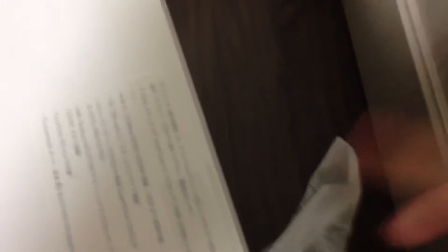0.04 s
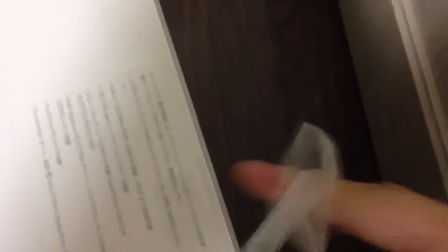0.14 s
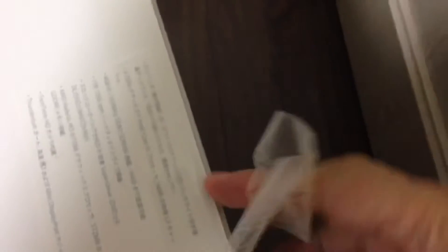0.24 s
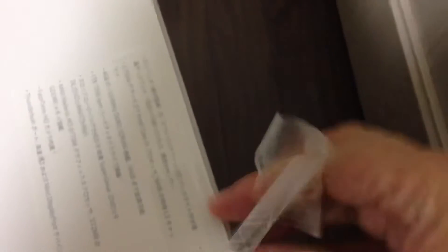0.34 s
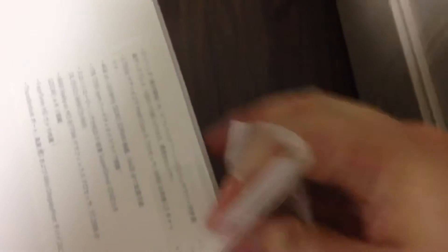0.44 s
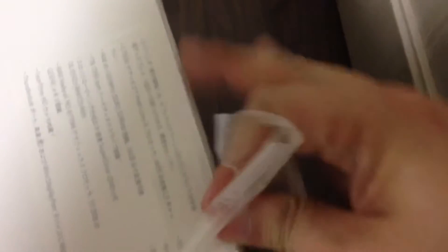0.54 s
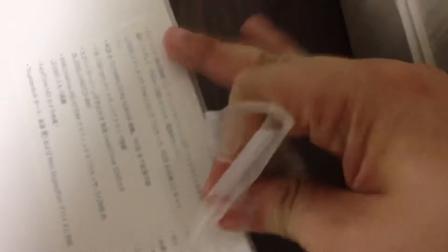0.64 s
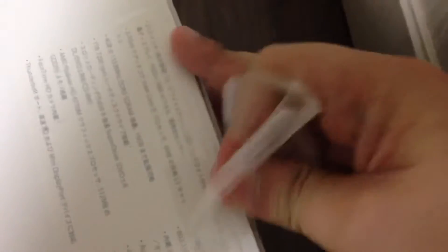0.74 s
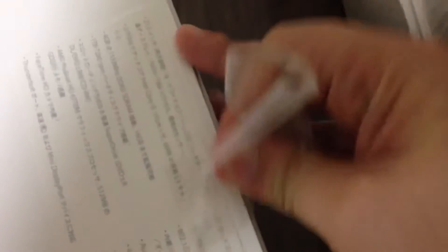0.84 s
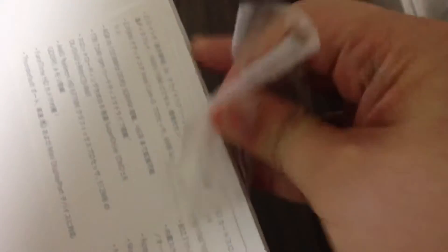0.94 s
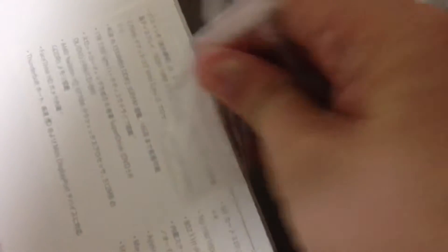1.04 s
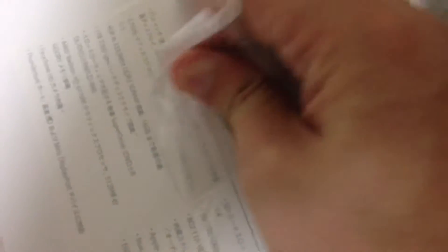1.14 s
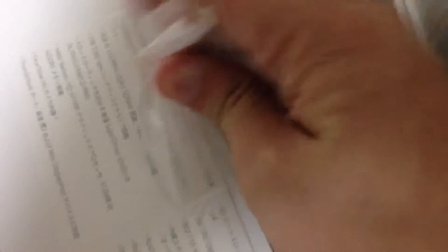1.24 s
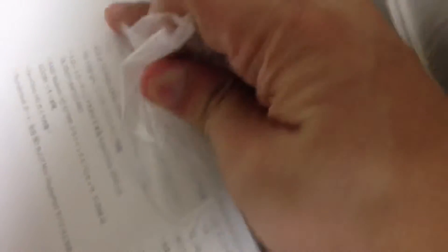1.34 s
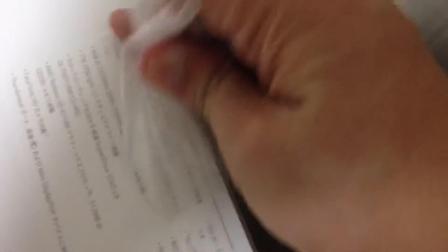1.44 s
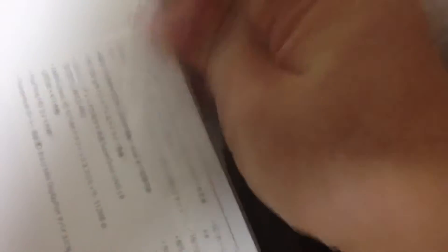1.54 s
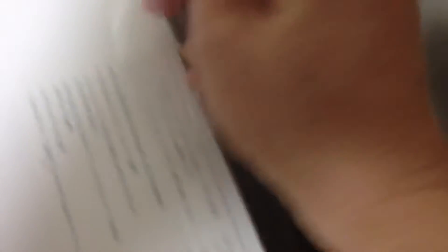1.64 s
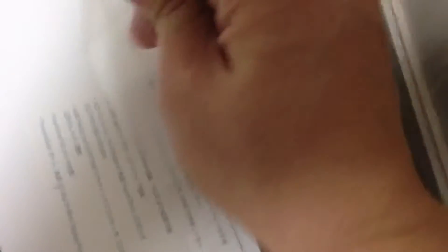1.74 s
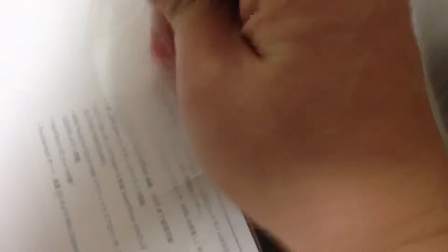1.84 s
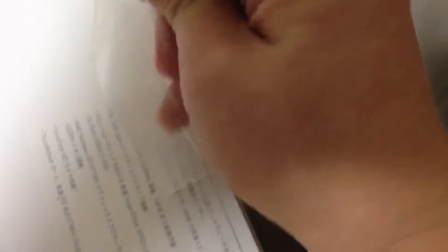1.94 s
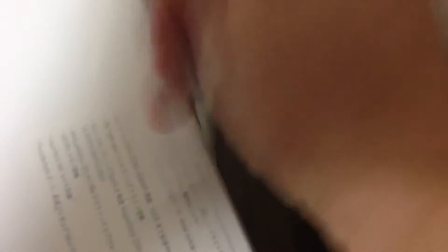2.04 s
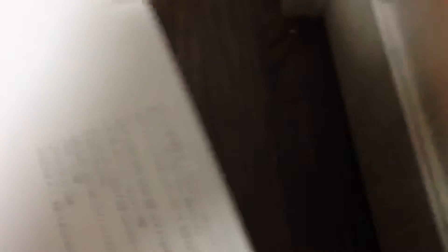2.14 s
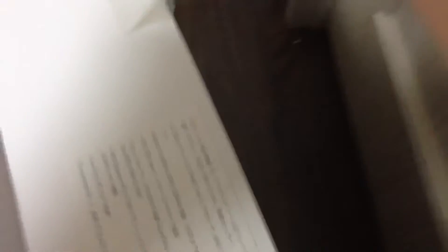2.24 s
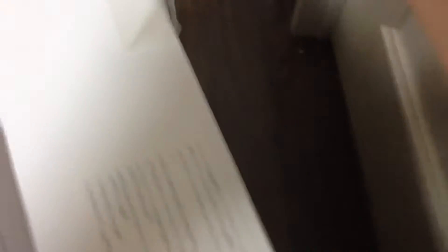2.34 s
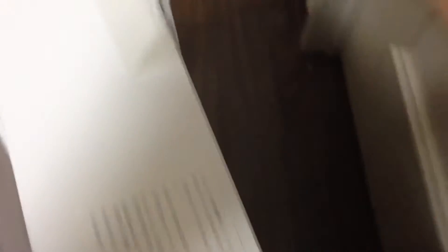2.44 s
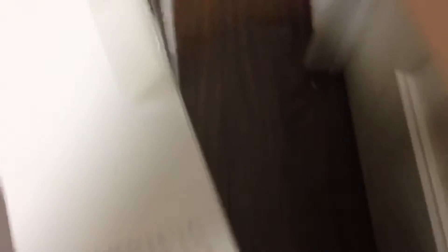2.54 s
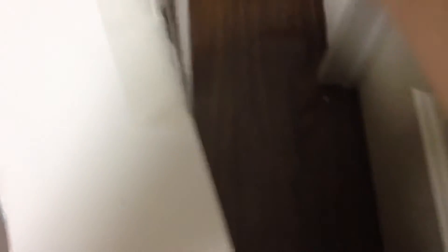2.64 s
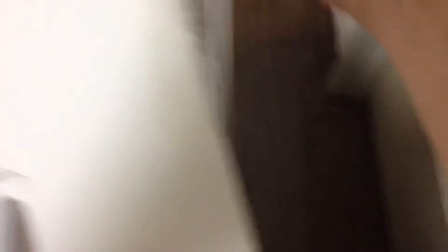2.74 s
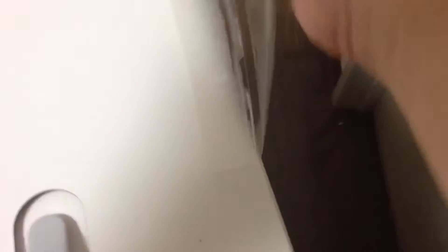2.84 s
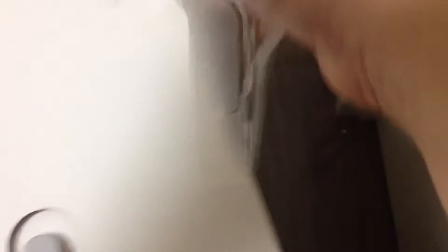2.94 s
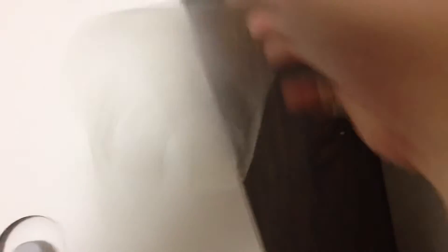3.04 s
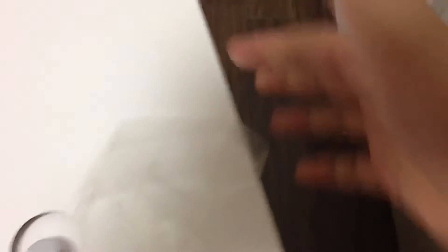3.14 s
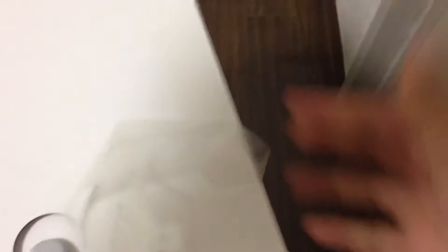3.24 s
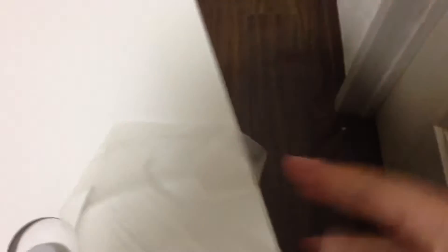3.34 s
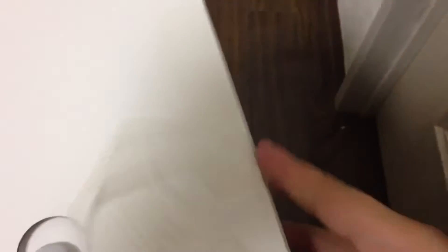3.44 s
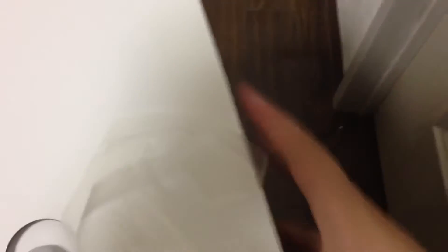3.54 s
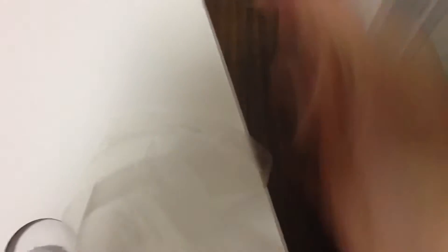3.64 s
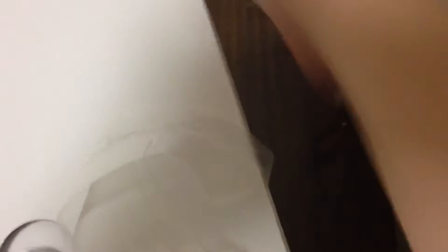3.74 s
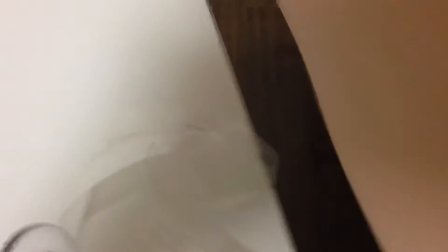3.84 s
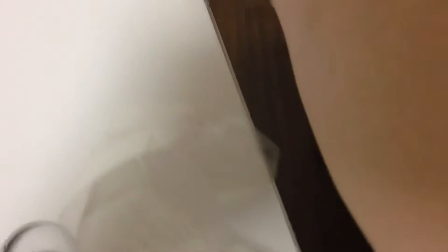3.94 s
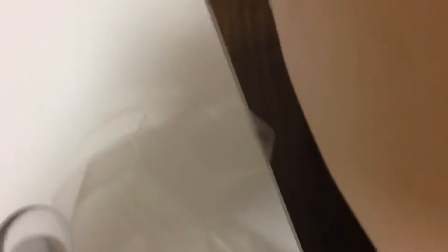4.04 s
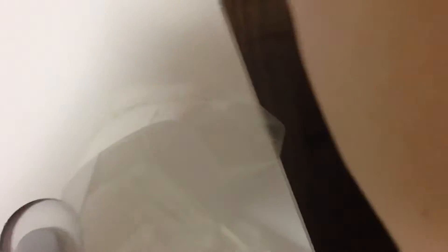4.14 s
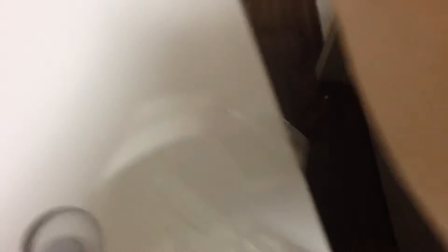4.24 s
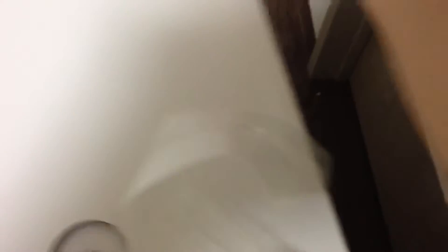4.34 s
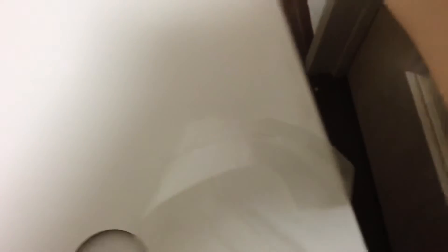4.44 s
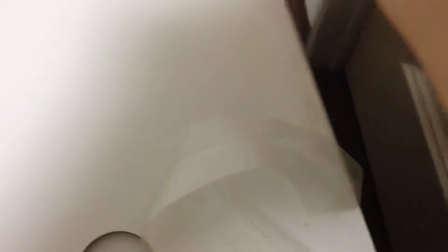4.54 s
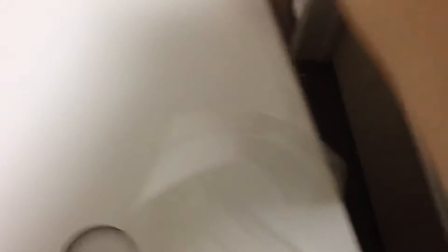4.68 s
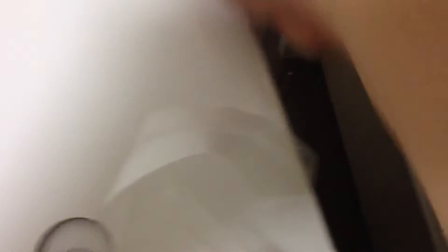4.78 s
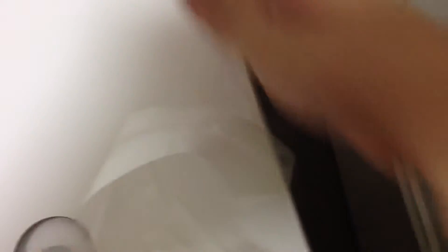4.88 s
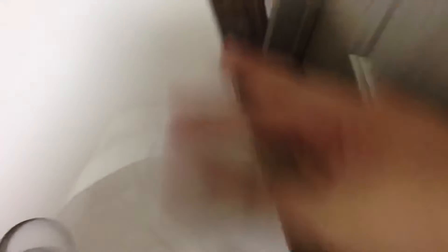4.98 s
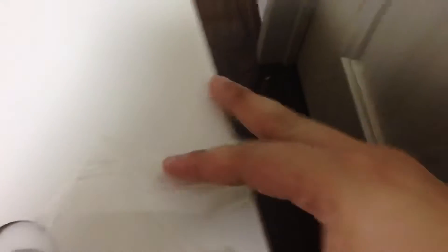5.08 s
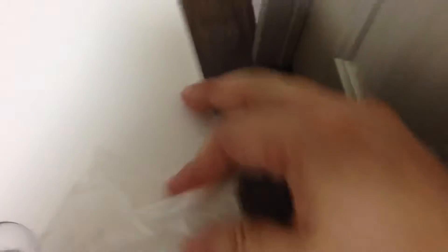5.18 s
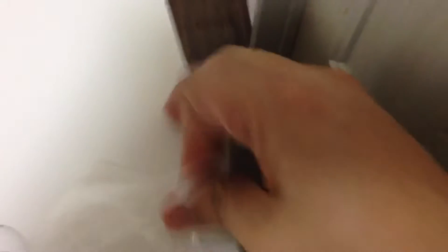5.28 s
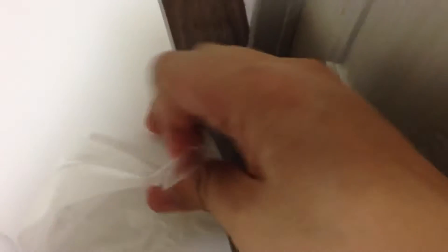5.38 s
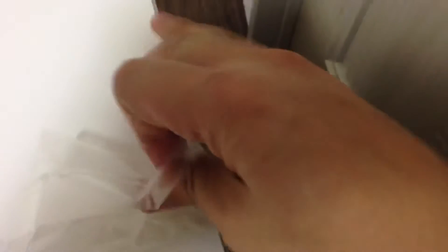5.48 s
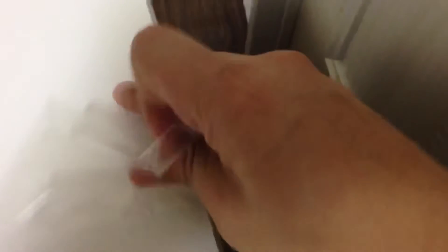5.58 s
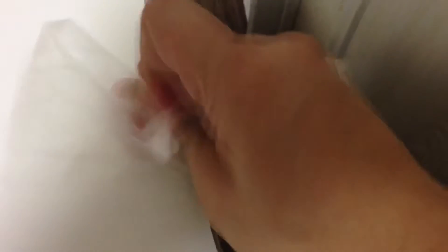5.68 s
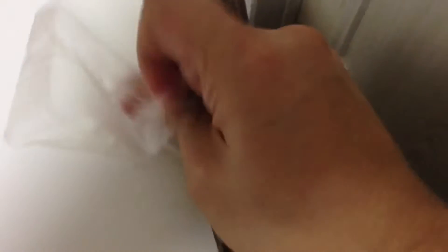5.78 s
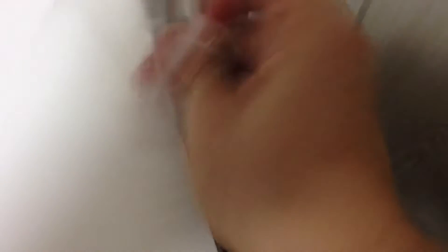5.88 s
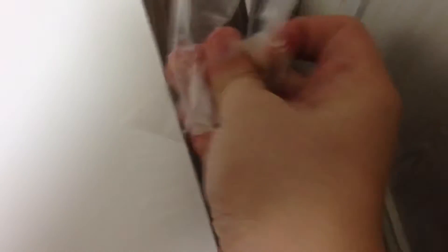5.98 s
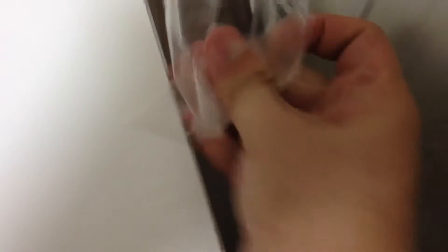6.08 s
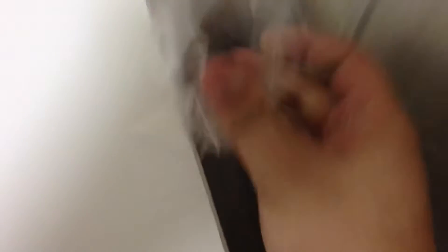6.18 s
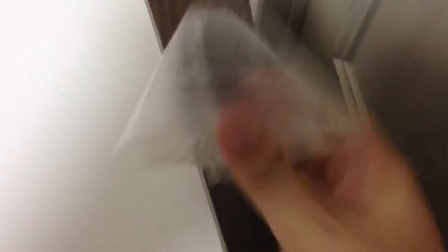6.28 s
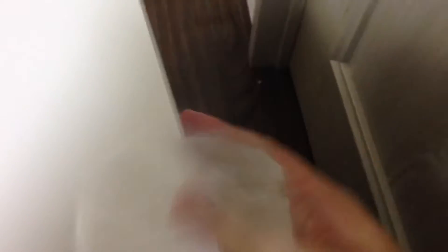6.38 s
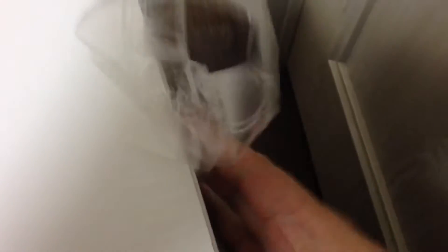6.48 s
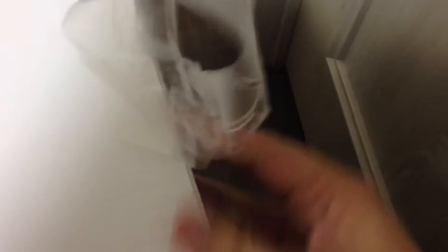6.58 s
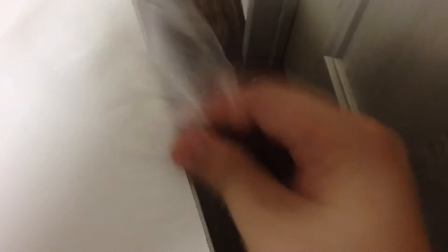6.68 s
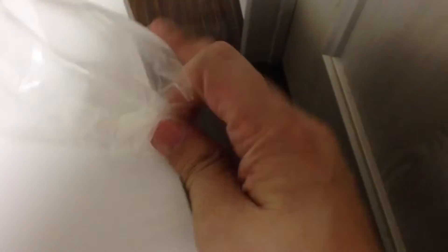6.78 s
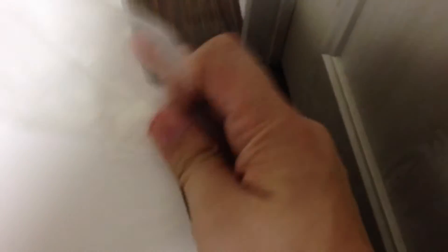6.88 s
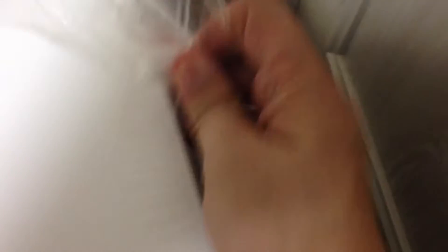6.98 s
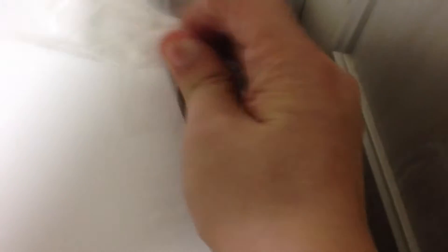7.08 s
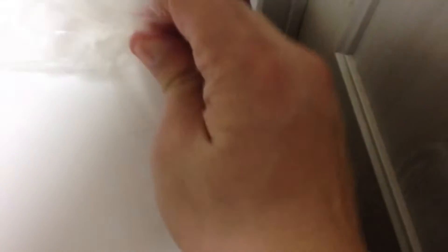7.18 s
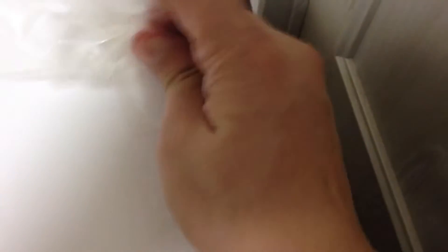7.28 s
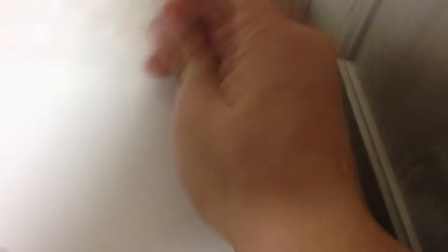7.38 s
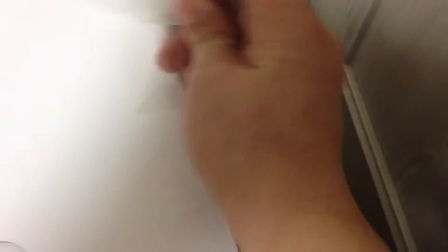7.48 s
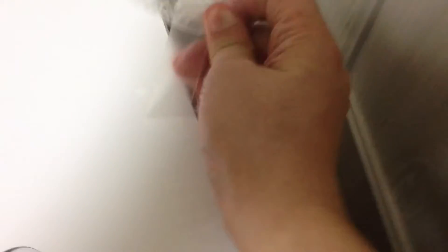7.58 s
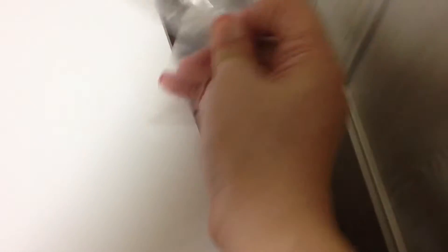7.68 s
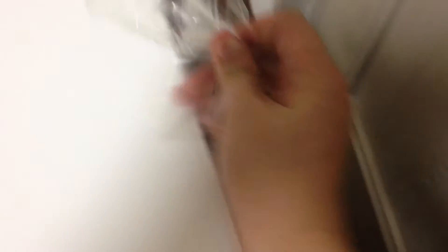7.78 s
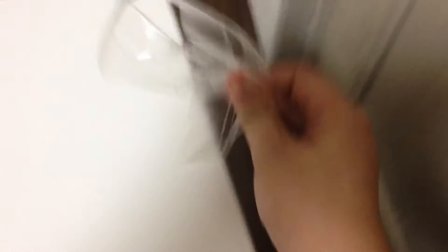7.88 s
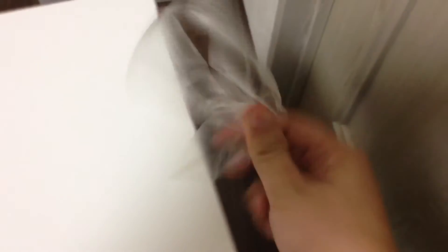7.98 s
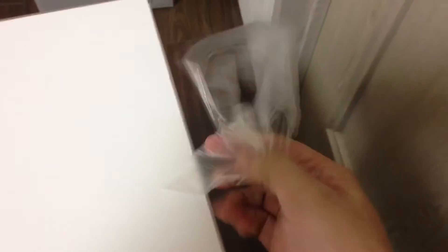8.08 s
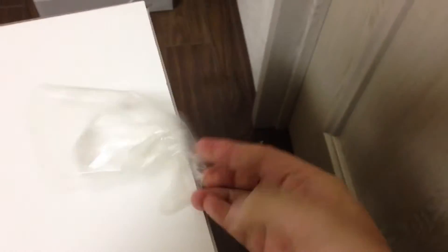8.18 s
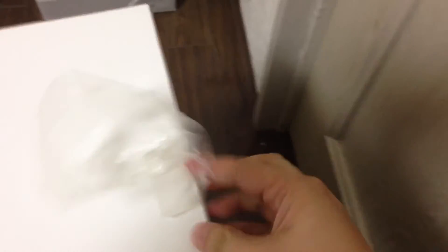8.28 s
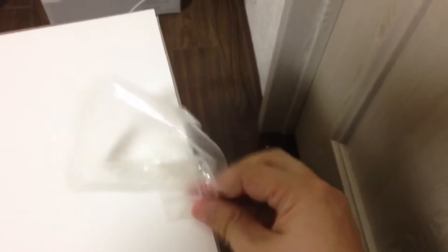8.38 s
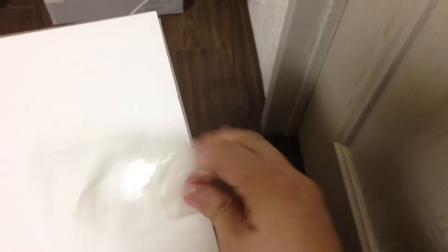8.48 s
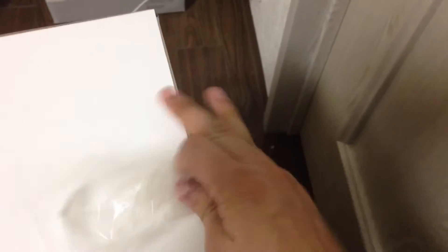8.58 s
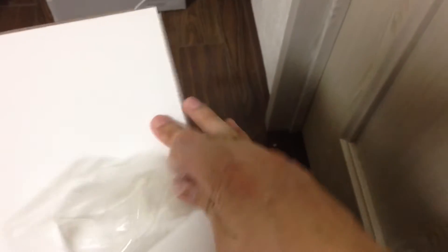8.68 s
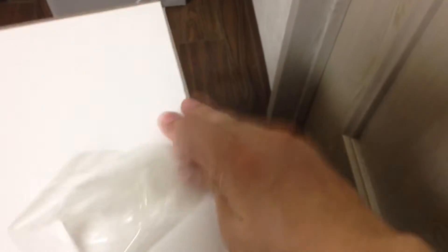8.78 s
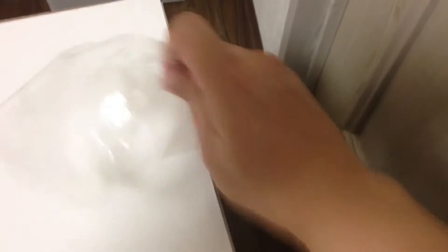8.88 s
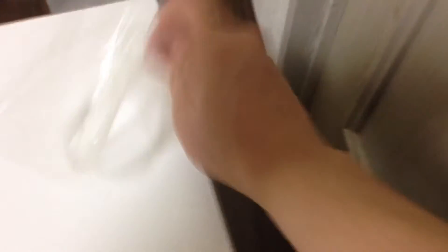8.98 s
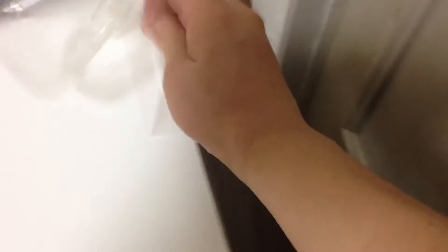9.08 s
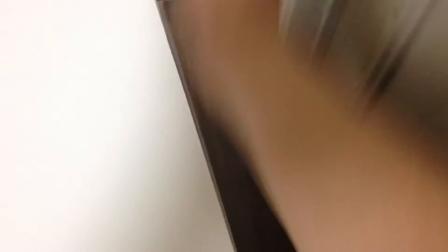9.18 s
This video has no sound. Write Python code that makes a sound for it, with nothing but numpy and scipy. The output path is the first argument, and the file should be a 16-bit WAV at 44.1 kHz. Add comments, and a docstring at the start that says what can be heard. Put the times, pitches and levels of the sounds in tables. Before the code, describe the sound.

A hand handles a crinkly plastic bag lying on a cardboard box, heard close up. Sharp, dry crackles jump out singly or in fast clumps, some with a short woody box thud. Between them fingers brush the film with light hiss and tiny ticks. The middle is quieter and duller; the second half is busy and loud. Indoors, with very short echoes, little bass and a faint steady hiss.

```python
"""In a small, dead room, a hand tugs at a stiff plastic bag lying on a cardboard box.
Creases in the film snap singly or in short ripping runs: clicks coloured by the film.
The hollow box thuds along: the same clicks set off its decaying tones.
Fingers rustle and brush over the film (tiny clicks and hiss), and their rubbing makes the box murmur.
The room adds short echoes and a faint hiss."""
import sys
import numpy as np
from scipy import signal
from scipy.fft import rfft, irfft
from scipy.io import wavfile
from scipy.ndimage import uniform_filter1d

SR = 44100
rng = np.random.default_rng(int(sys.argv[2]) if len(sys.argv) > 2 else 0)


def materialize(psi):
    """Save the field psi as 16-bit PCM at rate SR to the path in sys.argv[1].

    A 1-D psi becomes a single channel; in a 2-D psi each row is a channel.
    """
    bounded = np.clip(np.atleast_2d(psi).T, -1, 1)
    quanta = np.round(bounded * 32767).astype(np.int16)
    wavfile.write(sys.argv[1], SR, quanta)


N = 406602
PLACES = 6   # spots on the bag, each with its own echoes

# how the plastic film colours a click: pitch_hz [Hz], level_db [relative dB per Hz]
FILM_COLOUR = [(290, -58), (500, -13.5), (647, -17), (746, -8.5), (1010, -6.5), (2370, -2), (3540, -3.5),
               (5210, -5.5), (9490, -5.5), (15200, -1)]
# ringing tones of the hollow box: pitch_hz [Hz], level_db [relative dB], t60_s [s to fall by 60 dB]
BOX_TONES = [(175, -14, 0.19), (210.2, 4, 0.17), (270.3, 7.5, 0.052), (376, 4, 0.031), (533, 5, 0.025),
             (752, 23, 0.0065), (1200, -4.5, 0.038)]


def from_db(db):
    """Turn decibels into a plain factor."""
    return 10 ** (np.asarray(db) / 20)


def unit(x, axis=None):
    """Scale a sound so that its energy (sum of squares) is 1."""
    return x / np.sqrt(np.sum(x ** 2, axis=axis, keepdims=True) + 1e-20)


def rms_one(x):
    """Scale a sound so that its average (rms) level is 1."""
    return unit(x) * np.sqrt(x.size)


def low_pass(x, hz, order=1):
    """Dull a sound by weakening what lies above hz."""
    return signal.lfilter(*signal.butter(order, hz, fs=SR), x)


def high_pass(x, hz):
    """Thin a sound by gently weakening what lies below hz."""
    return signal.lfilter(*signal.butter(1, hz, "high", fs=SR), x)


def ring(x, hz, sharpness):
    """Keep what lies near hz; a sharper resonance rings for more cycles."""
    return signal.lfilter(*signal.iirpeak(hz, sharpness, SR), x)


def colour(x, spectrum, size=512):
    """Give a sound a spectrum with a filter that answers as early as possible (minimum phase)."""
    hz, level_db = np.transpose(spectrum)
    grid_hz = np.linspace(1, SR / 2, size + 1)
    grid_db = np.interp(np.log(grid_hz), np.log(hz), level_db)
    cepstrum = irfft(np.log(from_db(grid_db)))
    # folding the second half onto the first leaves no sound ahead of a click
    cepstrum[1:size] *= 2
    cepstrum[size + 1:] = 0
    kernel = irfft(np.exp(rfft(cepstrum)))[:size]
    kernel = kernel.reshape((1,) * (x.ndim - 1) + (-1,))
    return signal.fftconvolve(x, kernel, axes=-1)[..., :x.shape[-1]]


def drift(rate_hz):
    """Random curve that wanders slowly around 0 with spread 1: noise smoothed twice."""
    r = np.exp(-2 * np.pi * rate_hz / SR)
    noise = rng.standard_normal(N + SR)
    curve = signal.lfilter([1], [1, -2 * r, r * r], noise)
    return rms_one(curve[SR:])   # the first second only lets the curve settle


def grains(shape, per_s, spread_db):
    """Clicks at random moments, up or down at random, most of them small and a few large."""
    draw = rng.random((3,) + shape)
    sizes = from_db(-spread_db * np.log(np.maximum(draw[0], .01)))
    signs = np.sign(draw[1] - .5)
    happens = draw[2] < per_s / SR
    return sizes * signs * happens


def room_hiss():
    """Steady faint hiss: noise with the spectrum of the quiet room."""
    # pitch_hz [Hz], level_db [relative dB per Hz]
    hiss_colour = [(35, -49), (60, 4.5), (102, -26.5), (225, -4.5), (318, -14), (1650, -28), (1810, -33),
                   (2120, -20), (15200, -28)]
    hiss = colour(rng.standard_normal(N), hiss_colour, size=2048)
    return from_db(-64.5) * rms_one(hiss)


def box_modes(size):
    """Each way the hollow box can vibrate is one sine tone that dies away."""
    t = np.arange(size) / SR
    return np.array([from_db(level_db - 60 * t / t60_s) * np.sin(2 * np.pi * pitch_hz * t)
                     for pitch_hz, level_db, t60_s in BOX_TONES])


def box_rumble():
    """Uneven rubbing sets all tones of the box murmuring."""
    rub = from_db(3.5 * drift(15)) * rng.standard_normal(N)
    rub = signal.lfilter([1], [1, -.95], rub)   # soft skin drives mostly the low tones
    box = box_modes(size=6000).sum(axis=0)
    return rms_one(signal.fftconvolve(rub, box)[:N])


def film_clicks(rustle_db):
    """Clumps of tiny film clicks over a duller sliding hiss; a light touch is nearly all hiss."""
    clicks = grains((N,), per_s=900 * from_db(5.0 * drift(29)), spread_db=6.5)
    dealt = rng.integers(0, PLACES, N)   # each click has the pitch of its own crease
    ringing = np.zeros(N)
    for k, hz in enumerate(np.geomspace(1600, 8000, PLACES)):
        ringing += ring(clicks * (dealt == k), hz, 1.3) / np.sqrt(hz)
    hiss = low_pass(from_db(2.5 * drift(30)) * rng.standard_normal(N), 4500)
    # all hiss at -67 dB and below, all clicks from -34 dB up
    share = np.clip((rustle_db + 67) / 33, 0, 1)
    return colour(share * rms_one(ringing) + (1 - share) * rms_one(hiss), FILM_COLOUR)


def crumpling():
    """Levels of rustle, its treble and rumble: each spell swells, holds and fades over the resting hand."""
    # spells of crumpling in the fingers: start_s [s], length_s [s], rustle_db [dB],
    # treble_db [dB, change of the rustle's treble], rumble_db [dB, murmur of the box]
    crumples = [(0.668, 0.11, -63, 2, -67), (0.882, 0.07, -51, 4, -75), (1.393, 0.42, -59.5, -3, -66.5),
                (2.194, 0.092, -66, 3, -59.5), (2.395, 0.07, -53.5, 2.5, -59), (2.76, 0.43, -42, -23, -57),
                (3.421, 0.092, -45, -2, -51), (3.918, 0.2, -61, -3.5, -57.5), (4.127, 0.27, -56, 0, -51.5),
                (4.452, 0.4, -59.5, -2.5, -60), (5.036, 0.2, -32.5, -1.5, -45),
                (5.601, 0.11, -42, 1.5, -55.5), (6.082, 0.33, -37, 2, -50.5),
                (6.959, 0.09, -42.5, 3.5, -51.5), (7.588, 0.11, -49.5, 2, -46.5),
                (7.972, 0.062, -38.5, 1.5, -54), (8.108, 0.18, -61, -7, -56.5),
                (8.373, 0.12, -42.5, -8, -62), (8.567, 0.38, -59, 3, -59.5), (8.853, 0.066, -48.5, 6, -44),
                (8.98, 0.25, -41.5, 4.5, -35)]
    rise_db_per_s, fall_db_per_s = 418.5, 161.5
    t = np.arange(N) / SR
    # the hand merely holding the bag
    rustle_db, treble_db, rumble_db = np.full(N, -75.5), np.zeros(N), np.full(N, -72.0)
    for start_s, length_s, film_db, high_db, box_db in crumples:
        before_s = np.maximum(start_s - t, 0)
        after_s = np.maximum(t - start_s - length_s, 0)
        below_db = rise_db_per_s * before_s + fall_db_per_s * after_s
        treble_db = np.where(film_db - below_db > rustle_db, high_db, treble_db)
        rustle_db = np.maximum(rustle_db, film_db - below_db)
        rumble_db = np.maximum(rumble_db, box_db - below_db)
    return rustle_db, treble_db, rumble_db


def handling():
    """Fingering plus single strokes, each with the colour of the stretch of film it crosses."""
    # film brushed or stretched: top_s [s, loudest moment], level_db [dB at the top],
    # rise_ms and fall_ms [ms per 12 dB], pitch_hz [Hz, brightness], rumble_db [dB, box at the top]
    brushes = [(0.154, -47, 5.6, 15, 4250, -53), (0.846, -21, 14.3, 5.2, 2500, -52),
               (0.958, -43, 28, 57, 5070, -67.5), (3.865, -48, 18, 27, 4000, -47),
               (4.001, -63.5, 6.2, 14, 1210, -41), (4.649, -65, 15, 9.1, 1190, -47.5),
               (4.757, -39.5, 33.5, 9.4, 2390, -40), (5.362, -65, 7.3, 17, 2980, -38.5),
               (9.03, -50, 12, 21, 2500, -28), (9.198, -43, 12, 27, 2450, -21.5)]
    rustle_db, treble_db, rumble_db = crumpling()
    t, rumble = np.arange(N) / SR, box_rumble()
    rustle = rms_one(film_clicks(rustle_db))
    dull = low_pass(rustle, 3600)
    treble = rustle - dull
    out = from_db(rustle_db) * (dull + from_db(treble_db) * treble)
    out += from_db(rumble_db) * rumble
    slide = colour(grains((N,), per_s=4800, spread_db=4.5), FILM_COLOUR)
    for top_s, level_db, rise_ms, fall_ms, pitch_hz, box_db in brushes:
        near = slice(int((top_s - .15) * SR), int((top_s + .15) * SR))
        ms = (t[near] - top_s) * 1000
        swell = from_db(-12 * np.where(ms < 0, -ms / rise_ms, ms / fall_ms))
        stroke = .5 * slide[near] + ring(slide[near], pitch_hz, 4.5)
        out[near] += swell * (from_db(level_db) * rms_one(stroke) + from_db(box_db) * rumble[near])
    return out


def snaps(size=6000):
    """A crease snaps with a first click; a rip goes on as a dense run of clicks, and the box thuds along."""
    # clearest snaps, rips and bumps: start_s [s], level_db [dB], length_ms [ms], pitch_hz [Hz, brightness]
    snap_list = [(0.284, -48.5, 4.3, 2680), (0.339, -34, 4, 4450), (0.3585, -22.5, 0.49, 5100),
                 (0.3844, -23, 2.3, 4550), (0.391, -15.5, 0.71, 3700), (0.4273, -25, 3.8, 4730),
                 (0.458, -39, 1.5, 5000), (0.4924, -29, 1.3, 5140), (0.5299, -12.5, 1.05, 4650),
                 (0.646, -40, 0.76, 4830), (0.6959, -18, 0.62, 4870), (0.7092, -17, 0.46, 4100),
                 (0.7224, -17.5, 1.8, 3560), (0.7294, -20, 1.4, 4230), (0.7391, -12.5, 0.63, 4850),
                 (0.7536, -36, 1.7, 5700), (0.8094, -25.5, 0.43, 4340), (0.818, -26, 0.62, 3270),
                 (0.8447, -20.5, 7.2, 4320), (0.8613, -10.5, 1.3, 4400), (0.87, -9.5, 1.2, 4740),
                 (1.003, -11, 8.1, 4880), (1.2185, -32, 0.38, 4130), (1.2365, -27, 1.7, 4530),
                 (1.258, -29.5, 0.98, 5200), (1.2886, -41.5, 1.3, 3870), (1.421, -25.5, 0.69, 6450),
                 (1.438, -14, 0.48, 4600), (1.4919, -28.5, 1.1, 4030), (1.5104, -11.5, 1.9, 4800),
                 (1.5194, -14, 1.1, 5170), (1.5442, -16, 7.2, 4540), (1.5582, -15.5, 13.1, 4700),
                 (1.7408, -19.5, 0.62, 3820), (1.8563, -48, 3.6, 3550), (1.9405, -14.5, 0.27, 4500),
                 (1.9865, -47, 12, 4500), (2.0279, -27, 2.9, 5500), (2.038, -10.5, 8.6, 3430),
                 (2.0534, -12, 22, 5230), (2.0803, -13, 9.5, 6400), (2.107, -13.5, 8, 5300),
                 (2.1202, -11.5, 5.9, 5600), (2.2324, -38.5, 0.7, 4970), (2.311, -39, 0.4, 6500),
                 (2.3601, -41, 1.3, 6400), (2.3843, -46, 1.6, 6300), (2.4177, -10, 4, 4150),
                 (2.6865, -44, 4.1, 3500), (2.7379, -36, 4.4, 4000), (2.7472, -28.5, 0.75, 4860),
                 (2.7596, -29, 1.2, 5600), (2.781, -31, 0.42, 4700), (2.793, -26.5, 2.9, 4070),
                 (2.805, -28, 3.1, 3750), (2.859, -38.5, 20, 3080), (2.886, -37.5, 23, 3400),
                 (2.939, -27, 3.7, 3540), (2.988, -31, 16.6, 4200), (3.026, -28, 2.1, 4000),
                 (3.051, -33.5, 3.7, 3600), (3.107, -31.5, 2.9, 3100), (3.1345, -33, 7.9, 3460),
                 (3.155, -33, 1.2, 6000), (3.204, -23.5, 3.9, 2450), (3.2582, -34.5, 2.1, 4230),
                 (3.341, -31.5, 0.71, 3780), (3.4173, -28, 7.6, 4000), (3.4297, -23, 2.7, 4620),
                 (3.5149, -24.5, 2.1, 3560), (3.541, -22, 1.5, 4740), (3.7122, -35.5, 3, 2780),
                 (4.173, -39.5, 5.5, 920), (4.291, -43.5, 7.4, 990), (4.345, -40, 7.3, 955),
                 (4.977, -31, 1.2, 4500), (4.9838, -25.5, 7.7, 3630), (5.0273, -17, 2.9, 3120),
                 (5.0537, -18.5, 2.2, 6000), (5.0652, -12, 1.9, 3740), (5.08, -17, 0.99, 4200),
                 (5.1086, -14, 2.7, 4660), (5.125, -16.5, 2, 4440), (5.132, -10, 1.1, 7700),
                 (5.145, -13, 5.6, 4630), (5.2, -32, 2.3, 3800), (5.2078, -13, 0.72, 3940),
                 (5.2372, -16, 8.5, 5600), (5.2605, -16, 4.1, 3550), (5.275, -22.5, 3, 5100),
                 (5.3, -20.5, 0.99, 4930), (5.348, -35, 1.9, 3800), (5.411, -38, 2.5, 3870),
                 (5.424, -28, 2.5, 3580), (5.5067, -45, 1.4, 5700), (5.534, -38, 1.4, 4500),
                 (5.5439, -13, 0.73, 4270), (5.559, -13.5, 4.8, 4430), (5.6761, -9, 2.95, 4800),
                 (5.782, -35, 0.89, 3500), (5.8287, -8.5, 1.45, 3280), (5.8652, -12, 3.3, 3430),
                 (5.8729, -14.5, 15.2, 4230), (5.8897, -13.5, 1.2, 3670), (5.9517, -33.5, 1.2, 4530),
                 (6.012, -35, 8.4, 4540), (6.0306, -11, 0.62, 5730), (6.0548, -25, 8.4, 6100),
                 (6.078, -26, 14.5, 5160), (6.141, -15.5, 0.58, 4840), (6.149, -27.5, 20, 4830),
                 (6.1794, -27, 35, 4300), (6.2584, -26.5, 2.6, 3800), (6.277, -24.5, 2.4, 4550),
                 (6.3033, -20, 0.6, 3570), (6.3453, -34, 6.4, 4080), (6.3708, -22.5, 7.8, 3100),
                 (6.4394, -35.5, 29, 2900), (6.4714, -18.5, 0.76, 4460), (6.606, -43.5, 32, 3630),
                 (6.6671, -11, 0.62, 4570), (6.679, -20, 0.41, 3500), (6.6842, -10, 0.69, 4670),
                 (6.6893, -17, 2.2, 3080), (6.7001, -15, 3.3, 4940), (6.709, -19, 1.5, 6560),
                 (6.7152, -25, 1.2, 5700), (6.7199, -21.5, 1.6, 3480), (6.7304, -13, 0.5, 5800),
                 (6.8762, -22, 4.4, 3570), (6.8847, -16.5, 2.2, 7300), (6.9122, -9.5, 9.8, 4660),
                 (6.967, -24, 1.2, 4850), (7.046, -28, 4, 5270), (7.0958, -32, 1.3, 4860),
                 (7.1168, -9.5, 8.8, 4420), (7.2728, -46, 2.8, 3020), (7.353, -34, 1.3, 5200),
                 (7.3787, -6, 0.73, 4080), (7.387, -15, 17.2, 4280), (7.5466, -28, 2.5, 5060),
                 (7.5715, -17, 0.77, 4120), (7.5813, -20, 0.77, 4350), (7.6236, -29.5, 3.6, 3580),
                 (7.6374, -12, 2.3, 4030), (7.657, -13, 3.2, 4440), (7.775, -41, 2.2, 4300),
                 (7.7874, -37, 12, 4100), (7.806, -31, 6.5, 4600), (7.825, -24.5, 2.9, 4000),
                 (7.913, -37.5, 1.4, 3500), (7.946, -30.5, 1.8, 5450), (7.9879, -32, 13, 4860),
                 (8.0336, -28.5, 2.8, 3970), (8.0849, -18.5, 1.5, 3420), (8.1428, -18.5, 3, 5570),
                 (8.1537, -18, 6.5, 4200), (8.2382, -41.5, 17, 3700), (8.31, -39, 2.5, 2550),
                 (8.343, -31.5, 14, 3300), (8.3804, -22, 0.87, 4500), (8.4108, -26.5, 2.9, 4300),
                 (8.43, -27, 8.2, 4200), (8.4425, -23.5, 3.5, 4000), (8.462, -21.5, 2.6, 4260),
                 (8.497, -25, 1.4, 4900), (8.5436, -36.5, 1.5, 1160), (8.569, -30, 2.8, 3660),
                 (8.6335, -32, 3.5, 4530), (8.666, -28, 1.5, 7600), (8.6989, -23, 0.68, 7600),
                 (8.7341, -33, 3.9, 5940), (8.7525, -27, 1.6, 5200), (8.7804, -11.5, 12.4, 4200),
                 (8.828, -11, 23.5, 4380), (8.929, -25, 1.7, 3120), (8.973, -19.5, 21, 4000),
                 (8.9861, -15.5, 30, 4370), (9.0072, -20, 20.6, 4630), (9.058, -17, 0.36, 7100),
                 (9.077, -25, 0.6, 7500), (9.087, -15.5, 4.6, 3900), (9.1294, -14.5, 7, 5150),
                 (9.139, -13.5, 7, 4500)]
    # how firmly the bag lies on the box: time_s [s], thud_db [dB, box thud beside a 1 ms snap]
    contact = [(0, -14), (0.45, -22), (0.72, -34), (1.0, -20.5), (1.25, -49), (1.6, -17.5), (1.94, -57),
               (2.06, -22), (2.42, -15), (3.2, -17), (3.4, -30.5), (3.71, -7), (4.25, -2), (4.98, -22.5),
               (5.3, -22), (5.56, -14), (5.88, -9.5), (6.06, -32), (6.25, -18.5), (6.7, -31.5), (7.12, -18),
               (7.65, -9), (7.82, -21.5), (8.2, -17.5), (8.7, -20), (9.0, -10.5), (9.22, -6)]
    start_s, level_db, length_ms, pitch_hz = np.transpose(snap_list)
    count = len(start_s)
    # a longer rip shakes the box more: 1 dB per doubling of its length
    thud_db = np.interp(start_s, *np.transpose(contact)) + 1 * np.log2(length_ms)
    ms = np.clip(length_ms, .3, 90)[:, None]
    t_ms = np.arange(size) / SR * 1000

    force = grains((count, size), per_s=9000, spread_db=3.5)
    force *= from_db(-6.0 * np.maximum(t_ms - 0.92 * ms, 0) / np.sqrt(ms))   # the run dies away
    force = unit(force, axis=1)
    force[:, :1] = 2.25 * ms ** -.6   # the shorter the snap, the more it is one single click

    film = colour(force, FILM_COLOUR)
    tone = rng.normal(0, 1, (count, 2))
    for k, centre_hz in enumerate(pitch_hz):
        # a broad resonance sets the brightness; a patch of film at a random pitch rings a few cycles
        patch_hz = centre_hz * from_db(3.95 * tone[k, 0])
        for ring_hz, width, share in [(centre_hz, 1.3, .8), (patch_hz, .2, .5)]:
            ringing = ring(film[k], min(ring_hz, .4 * SR), 1 / width)
            film[k] = (1 - share) * film[k] + share * ringing
        film[k] = high_pass(film[k], 0.38 * centre_hz)
        edge_hz = min(9500 * (centre_hz / 4500) ** 1.4, .45 * SR)   # dull creases lose more treble
        film[k] = low_pass(film[k], edge_hz, order=2)

    # every snap strikes the tones of the box in its own random mix
    bodies = from_db(rng.normal(0, 3.5, (count, len(BOX_TONES)))) @ box_modes(size)
    thud = signal.fftconvolve(force, bodies, axes=1)[:, :size]
    strength = from_db(level_db)[:, None] * np.sqrt(ms * SR / 1000)   # longer means more energy
    sound = strength * (unit(film, axis=1) + from_db(thud_db)[:, None] * unit(thud, axis=1))
    out = np.zeros((PLACES, N + size))
    for k, at in enumerate((start_s * SR).astype(int)):
        out[k % PLACES, at:at + size] += sound[k]   # the creases lie all over the bag
    return out[:, :N]


def room(x, size=14000):
    """Direct sound, near reflections and a short tail whose treble dies first; each place echoes its own way."""
    tail_db, tail_t60_s, treble_t60_s, split_hz = -6, 0.17, 0.11, 2200
    near_db, near_t60_s = 0, 0.005   # first reflections off box, floor and hand
    t = np.arange(size) / SR
    noise = rng.standard_normal((2, PLACES, size))
    low = low_pass(noise[0], split_hz)
    treble = noise[0] - low
    tail = low * from_db(-60 * t / tail_t60_s) + treble * from_db(-60 * t / treble_t60_s)
    tail *= 1 - np.exp(-t / 0.0011)   # the tail builds up over about a millisecond
    near = noise[1] * from_db(-60 * t / near_t60_s) * (t > .0006)
    echoes = from_db(tail_db) * unit(tail, axis=1) + from_db(near_db) * unit(near, axis=1)
    return (x + signal.fftconvolve(x, echoes, axes=1)[:, :N]).sum(axis=0)


def scene():
    """Bag and box in the room, over a faint hiss."""
    hiss = room_hiss()
    # the fingers wander from place to place, one step every 2000 samples (45 ms)
    roam = (np.arange(N) / 2000 - np.arange(PLACES)[:, None]) % PLACES
    here = np.maximum(1 - abs(roam - 1), 0)
    bag = here * handling() + snaps()
    return (room(bag) + hiss)[None]


def record(dry):
    """Bass is cut, gain ducks after loud sounds and recovers, peaks are rounded, the top is cut."""
    x = signal.sosfilt(signal.butter(6, 145, "high", fs=SR, output="sos"), dry)
    level_db = 10 * np.log10(uniform_filter1d(x[0] ** 2, 441) + 1e-12)   # average over 10 ms
    fall_db = 30 * np.arange(N) / SR   # the held level sinks by 30 dB per second
    held_db = np.maximum.accumulate(level_db + fall_db) - fall_db
    duck_db = -.25 * np.maximum(held_db + 18.5, 0)   # a quarter of what exceeds -18.5 dB
    r = np.exp(-1 / (0.054 * SR))   # the gain follows with a lag of 54 ms
    x = x * from_db(signal.lfilter([1 - r], [1, -r], duck_db))
    x = x / (1 + (x / .8) ** 6) ** (1 / 6)   # peaks bend over below 0.8
    x = high_pass(x, 90)
    return signal.sosfilt(signal.cheby2(16, 90, 16400, fs=SR, output="sos"), x)


dry = scene()
out = record(dry)
materialize(out)
```